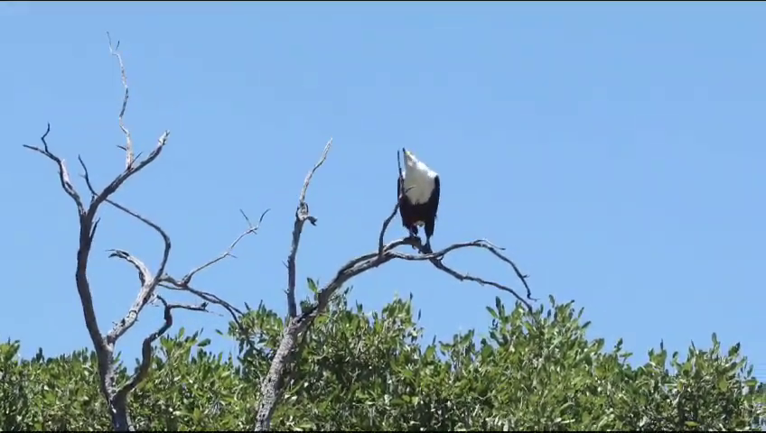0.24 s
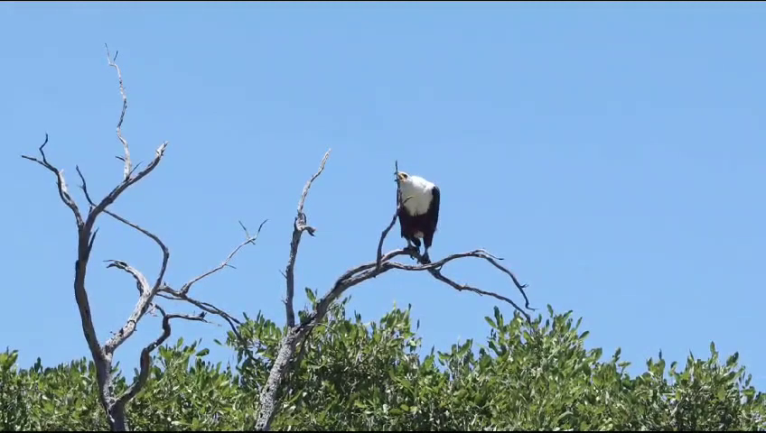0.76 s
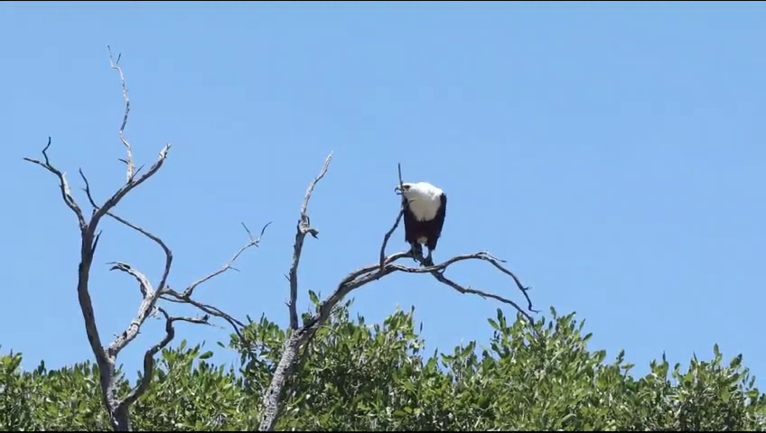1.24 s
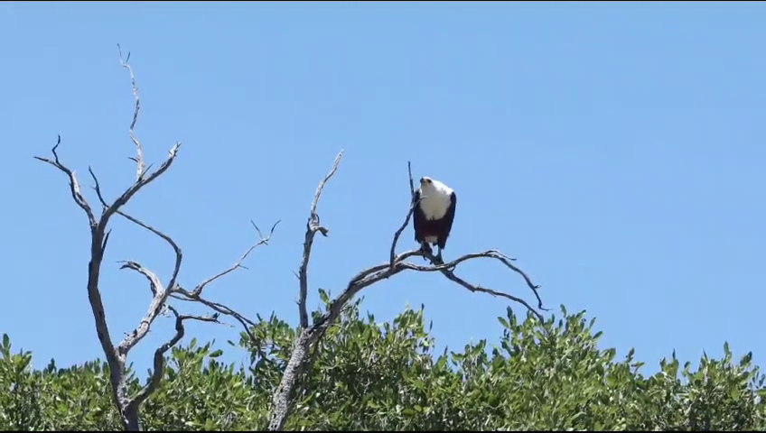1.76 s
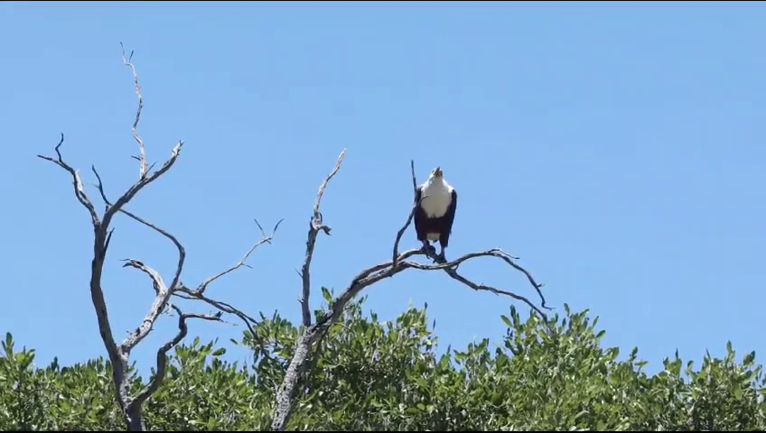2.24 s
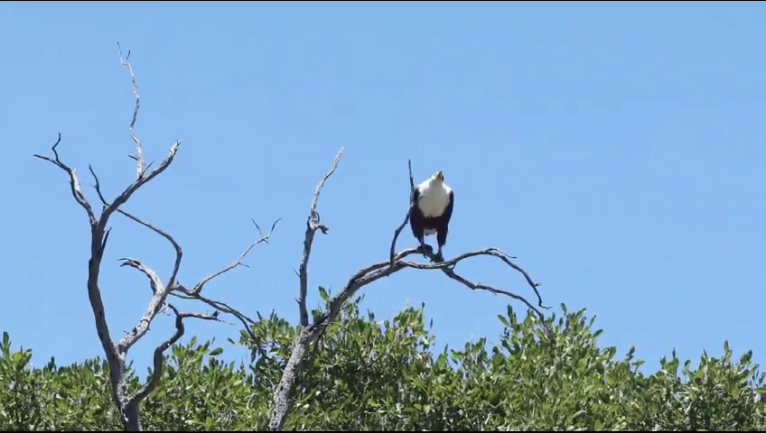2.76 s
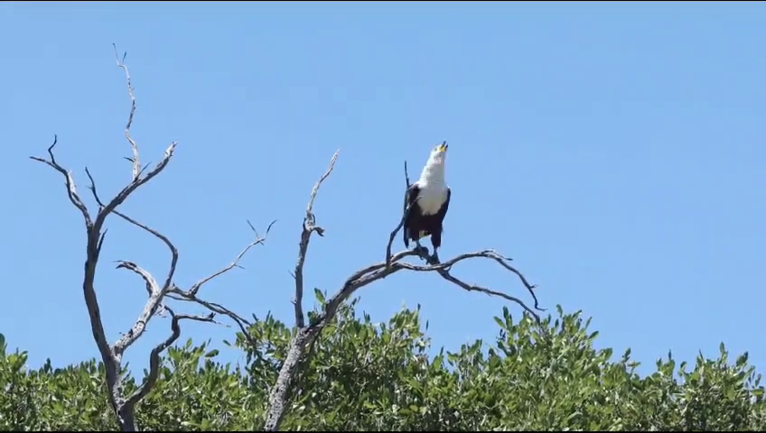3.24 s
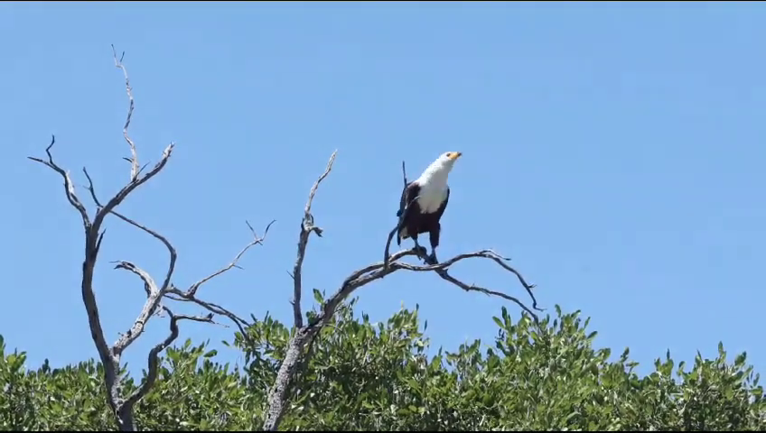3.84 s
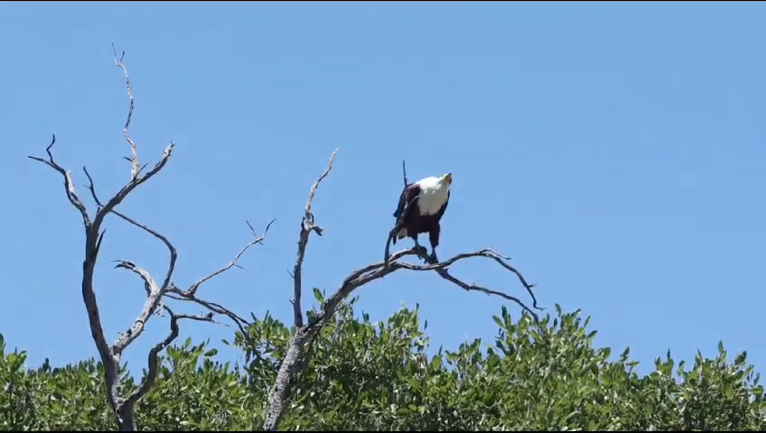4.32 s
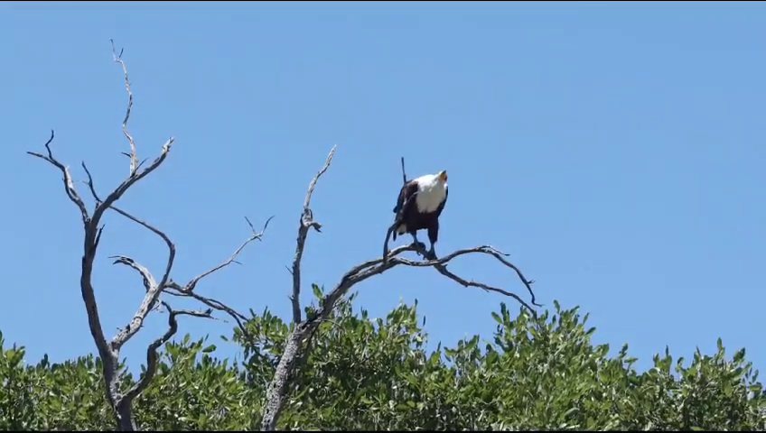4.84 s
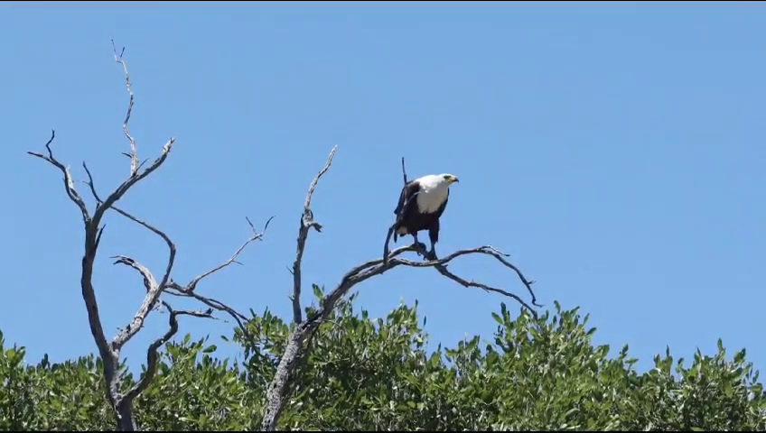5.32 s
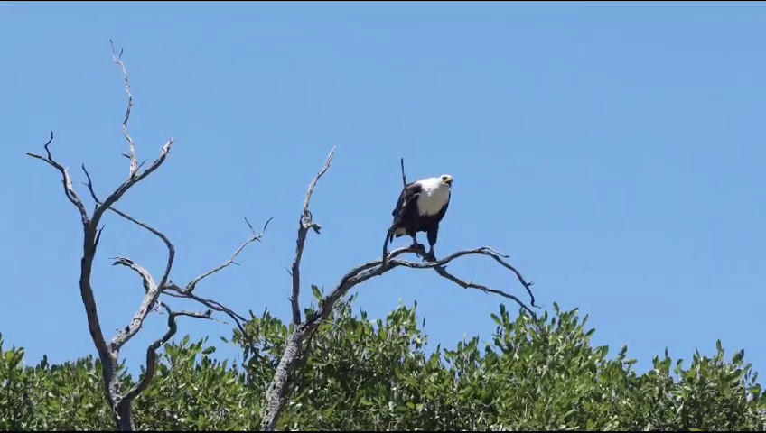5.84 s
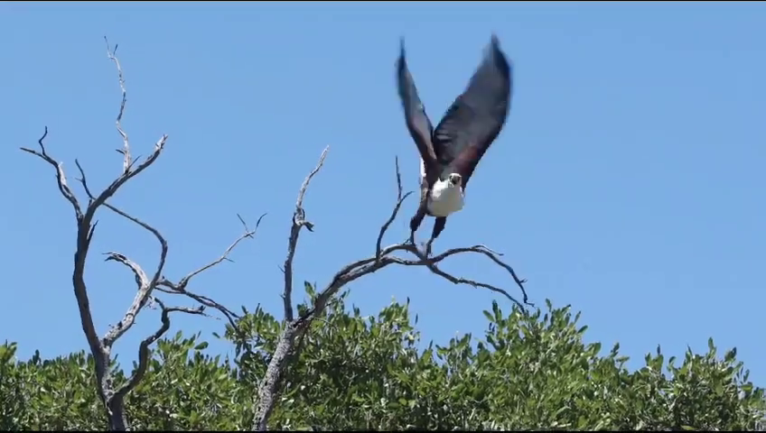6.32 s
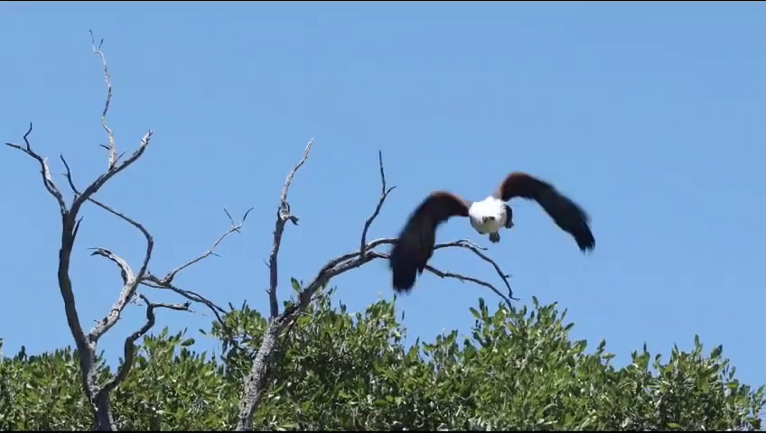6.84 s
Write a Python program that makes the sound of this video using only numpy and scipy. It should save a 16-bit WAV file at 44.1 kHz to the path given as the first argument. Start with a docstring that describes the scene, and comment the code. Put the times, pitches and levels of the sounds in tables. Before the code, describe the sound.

A small bird chirps faintly far off, then a large bird of prey starts a series of high, clear yelps outdoors. They grow louder and jump abruptly in pitch, then drop back. A soft hiss and four quick pants fill a short gap before a second, briefer bout of lower yelps. Each call leaves a light, lingering echo from the trees, and the microphone picks up almost no background noise.

```python
"""An eagle on a bare branch, with a long diffuse echo from trees and banks over near silence.
0-0.8 s: a puff of air, the echo of an earlier note dies away, a small bird chirps far off.
0.6-5 s: yelps, a near-pure syrinx tone with strong overtones that jumps between registers; slack
membranes rasp at the note edges, and the eagle coos softly while drawing air.
5.1-5.8 s: a hiss through the open beak, then four pants. 5.8-6.8 s: the last yelps."""
import sys
import numpy as np
from scipy import signal
from scipy.fft import rfft, irfft, next_fast_len
from scipy.io import wavfile
from scipy.ndimage import uniform_filter1d

SR = 44100
rng = np.random.default_rng(int(sys.argv[2]) if len(sys.argv) > 2 else 0)


def pcm_store(signal):
    """Save signal as 16-bit PCM."""
    levels = np.round(np.clip(np.atleast_2d(signal), -1, 1) * 32767)
    wavfile.write(sys.argv[1], SR, levels.astype(np.int16).T)


N = 312228
BAND_LIMIT_HZ = 15700

# Syrinx contours, one per note or register: t/s, f/Hz, fundamental/dB, 2nd harmonic/dB
YELP_CONTOURS = [
    [(.655, 964, -34.5, -26), (.675, 1039, -43, -47.5), (.7, 1078, -35.5, -48.5), (.725, 1101, -38, -44),
     (.77, 1121, -39, -44), (.88, 1119, -39.5, -45), (.96, 1140, -38, -40), (1.04, 1143, -41.5, -47.5),
     (1.1, 1164, -36, -39), (1.15, 1172, -30.5, -42.5), (1.24, 1161, -39, -39), (1.31, 1100, -40.5, -47.5),
     (1.35, 984, -41.5, -41.5)],
    [(1.555, 1063, -42, -45.5), (1.59, 1105, -41.5, -46.5), (1.64, 1135, -39.5, -40),
     (1.72, 1141, -38.5, -45), (1.81, 1100, -39.5, -41.5), (1.85, 1049, -35.5, -47.5),
     (1.875, 872, -60, -39)],
    [(2.168, 1020, -42.5, -57.5), (2.19, 1029, -30, -48.5), (2.232, 1158, -28, -44)],
    [(2.232, 1309, -24.5, -49.5), (2.27, 1359, -24.5, -44.5), (2.33, 1386, -22, -44),
     (2.41, 1402, -20, -41.5), (2.5, 1383, -23, -44), (2.527, 1377, -22.5, -47.5), (2.54, 1284, -21, -40)],
    [(2.54, 1194, -29.5, -40.5), (2.57, 1159, -32, -44), (2.6, 1113, -37, -42.5), (2.64, 999, -47.5, -56)],
    [(3.052, 1031, -47, -30), (3.067, 1241, -38, -36), (3.087, 1418, -26.5, -27.5),
     (3.125, 1440, -22.5, -28.5), (3.16, 1424, -24.5, -31), (3.19, 1342, -28.5, -34),
     (3.215, 1262, -31, -34)],
    [(3.215, 1632, -23.5, -31.5), (3.24, 1519, -27.5, -41), (3.265, 1430, -38, -53.5),
     (3.295, 1380, -29, -56)],
    [(3.295, 1352, -32, -55.5), (3.325, 1523, -33.5, -51), (3.36, 1540, -55.5, -52),
     (3.385, 1514, -33, -46), (3.4, 1386, -22.5, -52.5)],
    [(3.4, 1351, -31, -48.5), (3.415, 1204, -29, -52), (3.43, 1120, -56.5, -55.5)],
    [(3.655, 1058, -48.5, -35.5), (3.67, 1212, -36.5, -36), (3.69, 1354, -26, -28),
     (3.715, 1363, -26, -33.5), (3.74, 1323, -26.5, -31.5), (3.767, 1241, -27.5, -33)],
    [(3.767, 1553, -20.5, -36), (3.79, 1458, -25, -42.5), (3.82, 1295, -32, -52)],
    [(3.82, 1305, -26, -46), (3.85, 1422, -34, -55.5), (3.89, 1435, -35.5, -53), (3.92, 1426, -34.5, -54),
     (3.942, 1350, -30, -50.5)],
    [(3.942, 1086, -26.5, -54.5), (3.962, 1070, -40.5, -60)],
    [(4.475, 802, -56, -58), (4.492, 989.4, -44.5, -48.5), (4.515, 1110, -43, -32.5),
     (4.57, 1200, -34, -38.5), (4.64, 1143, -38.5, -35.5), (4.72, 1122, -39, -35.5),
     (4.8, 1146, -35.5, -36.5), (4.91, 1152, -40, -37), (4.94, 1048, -38, -33), (4.965, 917, -52.5, -45.5)],
    [(5.85, 898, -41.5, -60), (5.875, 1014, -46, -51), (5.905, 1088, -42, -50.5), (5.96, 1093, -46.5, -42),
     (6.03, 1117, -43, -33), (6.1, 1120, -45, -33), (6.15, 1136, -45.5, -30.5), (6.2, 1089, -43, -38),
     (6.25, 1026, -40.5, -39)],
    [(6.435, 978, -42, -38), (6.465, 1055, -43.5, -44), (6.495, 1042, -37, -37.5),
     (6.525, 1055, -33.5, -39), (6.555, 1144, -40.5, -39), (6.59, 1082, -38.5, -39),
     (6.625, 1028, -35.5, -38), (6.66, 930, -50.5, -43)],
    [(6.66, 920, -45.5, -39.5), (6.71, 995, -39.5, -46.5), (6.745, 940, -40.5, -44), (6.77, 869, -62, -51)],
]
# Hoarseness with taut membranes, per note: 0-1
YELP_HOARSENESS = [.05, .05, .1, .03, .2, .05, .55, .33, .7, .05, .6, .28, .8, .08, .05, .12, .5]
# Timbre per note: taut f/Hz, 3rd harmonic/dB, drift/dB, 4th/dB, drift/dB, brightness (5th up)/dB,
# drift/dB, throat air/dB, treble lift/(dB/octave)
YELP_TIMBRES = [(1159.4, -45.5, -2.5, -61.5, -3, -51.5, -5.5, -69.5, -2.5),
                (1154, -45.5, 0, -62, -17.5, -54, 7, -74, 4.5),
                (1130, -50, -2, -61.5, 0, -53.5, -1.5, -87, 2.5),
                (1410, -50, 11.5, -49.5, 6.5, -52, 2, -82, -0.5),
                (1140, -43.5, 6.5, -53.5, 8.5, -54.5, -2, -74.5, 6.5),
                (1425, -35.5, -8.5, -42, -10, -57, -18, -80.5, -3),
                (1600, -63, -6, -71.5, -8, -79, -2, -88, 2), (1500, -56, 6, -70.5, 3, -67, 3, -86.5, 4.5),
                (1410, -51, 4.5, -50.5, -2.5, -59, 4, -85.5, -5.5),
                (1327, -41, -22, -47, -16.5, -56.5, -5, -76.5, 4.5),
                (1480, -66, -16, -63.5, -5, -61.5, -6, -78, -4), (1425, -60.5, 2, -73, 0, -61.5, 9, -77, 9),
                (1240, -44, 0, -75, -4, -54, 4, -85, 3),
                (1145, -43.5, 0.5, -58.5, -8.5, -52, -0.5, -72, -5),
                (1137, -46, -12, -59, -9.5, -60, -6, -84, 7),
                (1130, -43, 3.5, -55.5, -5, -57, 14, -72, 4.5),
                (993, -55.5, 4, -68.5, -2, -68.5, 18, -68, 0)]
# Windpipe dip on the 4th harmonic: f/Hz, gain/dB
WINDPIPE_NOTCH = [(4200, -0.5), (4400, -6), (4600, -10.5), (4900, -13), (5300, 0.5)]
# Harmonics 5-15: f/Hz, level/dB re brightness
UPPER_SPECTRUM = [(4600, -8.5), (5600, -6.5), (6800, 1), (8000, 0.5), (9200, -13), (10500, -16),
                  (12000, -16.5), (15000, -24.5)]
# Treble air noise: f/Hz, relative density/dB
FIZZ_SPECTRUM = [(3000, -38), (6000, -5.5), (9000, 8.5), (15500, 6.5)]
FIZZ_DB, FIZZ_HOARSE_DB, LIFT_FROM_HZ = -18, 6, 6970
# Change per unit of slack:
SLACK_3RD_DB, SLACK_4TH_DB, SLACK_BRIGHT_DB = -67, -60.5, -110
SLACK_AIR_DB, SLACK_LIFT_DB_OCT = 97, -100
BREAKING_SLACK = .155


def yelp(contour, taut_hoarse, taut_hz, third_db, third_drift_db, fourth_db, fourth_drift_db,
         bright_db, bright_drift_db, air_db, lift_db_oct):
    """Syrinx tone plus air noise; slack membranes sound dull and hoarse and leak more air."""
    t, hz, first_db, second_db = per_sample(contour)
    count = len(t)
    hz = uniform_filter1d(hz, round(0.02 * SR), mode="nearest")  # muscles round off pitch turns
    slack = abs(1 - hz / taut_hz)
    hoarse = np.minimum(taut_hoarse + (slack / BREAKING_SLACK) ** 2, .9)
    wobble = .0005 * wander(count, .005) + .0015 * wander(count, .015)
    phase = 2 * np.pi * np.cumsum(hz * (1 + wobble)) / SR

    along = np.linspace(-.5, .5, count)
    third_db = third_db + third_drift_db * along + SLACK_3RD_DB * slack
    fourth_db = fourth_db + fourth_drift_db * along + SLACK_4TH_DB * slack
    bright_db = bright_db + bright_drift_db * along + SLACK_BRIGHT_DB * slack
    lift_db_oct = lift_db_oct + SLACK_LIFT_DB_OCT * slack
    levels_db = [first_db, second_db, third_db, fourth_db + lookup(WINDPIPE_NOTCH, 4 * hz)]
    for k in range(5, 16):
        octaves = np.log2(np.maximum(k * hz / LIFT_FROM_HZ, 1))
        levels_db.append(bright_db + lookup(UPPER_SPECTRUM, k * hz) + lift_db_oct * octaves)

    tone = harmonics(hz, phase, levels_db, hoarse) + gain(first_db) * half_harmonics(t, hz, phase)
    fizz_db = bright_db + FIZZ_DB + FIZZ_HOARSE_DB * hoarse
    fizz = gain(fizz_db) * coloured(rng.standard_normal(count), FIZZ_SPECTRUM)
    air = growl(count, air_db + SLACK_AIR_DB * slack)
    to_edge_s = np.minimum(t - t[0], t[-1] - t)
    fade = np.sin(np.pi / 2 * np.minimum(1, to_edge_s / 0.0037)) ** 2
    return t[0], fade * (np.sqrt(2) * tone + fizz + air)


def harmonics(hz, phase, levels_db, hoarse):
    """Syrinx harmonics, each flickering on its own; higher ones break up first and smear wider."""
    count = len(hz)
    tone = 0
    for k, db in enumerate(levels_db, 1):
        noisy = np.clip(hoarse ** 2 * k / 3 + .05 * max(k - 8, 0), 0, 1)
        grain_s = .008 / max(k, 2)
        pure = np.sin(k * phase)
        blur = wander(count, grain_s) * pure + wander(count, grain_s) * np.cos(k * phase)
        partial = np.sqrt(1 - noisy ** 2) * pure + noisy * blur / np.sqrt(2)
        flicker_db = np.interp(k, [1, 2, 7, 9], [.8, 2, 2, 4.5]) * wander(count, .014)
        swell_db = 2.5 * wander(count, .04) * (k > 3)
        tone += gain(db + flicker_db + swell_db) * partial * (k * hz < BAND_LIMIT_HZ)
    return tone


# Spells of pulse alternation: start t/s, deepest t/s, end t/s, depth/dB
ALTERNATIONS = [(4.732, 4.897, 4.96, -3), (6.633, 6.672, 6.8, 2.5)]
# Half harmonics at 0 dB depth: f/Hz, level/dB re fundamental
HALF_SPECTRUM = [(500, -6), (570, -49), (1300, 1), (1450, 3), (1750, 7.5), (2900, -17), (4000, -27.5),
                 (8000, -40.5)]


def half_harmonics(t, hz, phase, ends_db=-41):
    """Strong and weak pulses alternate, putting lines halfway between the harmonics."""
    depth = sum(gain(db + np.interp(t, times_s, [ends_db, 0, ends_db], -200, -200))
                for *times_s, db in ALTERNATIONS)
    return depth * sum(gain(lookup(HALF_SPECTRUM, k * hz)) * np.sin(k * phase)
                       for k in np.arange(8) + .5)


def growl(count, db):
    """Leaking air rings the throat between the first two harmonics."""
    air = resonate_twice(rng.standard_normal(count), hz=1720, width_hz=240)
    return gain(db + 1.5 * wander(count, .04)) * unit_rms(air)


# Pulses at note edges: t/s, length/s, first rate/Hz, last rate/Hz, level/dB, roughness, chest gain/dB
RASP_BURSTS = [(0.635, 0.038, 398.4, 467, -46.5, 0.7, 0.5), (1.331, 0.052, 424, 388, -54, 0.48, -2),
               (1.525, 0.048, 323.1, 503.5, -38.5, 0.69, -3), (1.863, 0.036, 468, 401, -50.5, 0.75, -12),
               (2.144, 0.041, 346, 515, -39.5, 0.51, 1.5), (3.039, 0.023, 395.4, 506, -42.5, 0.61, -4),
               (3.393, 0.061, 550, 462, -56, 0.84, -24), (3.639, 0.028, 408.7, 460, -44.5, 1.04, -7),
               (3.939, 0.029, 569, 457, -55, 0.73, -21), (4.457, 0.03, 386.4, 436, -47, 0.7, 2.5),
               (4.944, 0.04, 445, 405, -57, 1.1, -30), (5.834, 0.036, 409, 502, -49.5, 0.1, 4.5),
               (6.24, 0.045, 469, 405, -42, 0.3, -2.5), (6.411, 0.049, 425, 498, -41, 0.61, -2),
               (6.746, 0.018, 458, 378, -49, 0.32, 1.5)]


def rasp(start_s, length_s, first_hz, last_hz, db, rough, chest_db):
    """Slack membranes slap unevenly, with a puff of noise on each slap."""
    count = round(length_s * SR)
    rate_hz = np.linspace(first_hz, last_hz, count) * (1 + 0.084 * rough * wander(count, .002))
    cycles = np.cumsum(rate_hz) / SR
    slaps = sum(np.cos(2 * np.pi * k * cycles) for k in range(1, 24))
    puffs = (0.1 + np.exp(-(cycles % 1) / 0.057)) * rng.standard_normal(count)
    drive = (1 - rough) * unit_rms(slaps) + rough * unit_rms(puffs)
    return start_s, gain(db) * throat(drive, chest_db) * np.hanning(count)


# Windpipe and beak resonances: f/Hz, width per pass/Hz, gain/dB
THROAT_MODES = [(963, 325, 2), (1483, 454, 10.5), (3360, 230, -14), (6200, 2100, -27.5)]
CHEST_HZ, CHEST_WIDTH_HZ = 457, 260


def throat(drive, chest_db):
    """Chest, windpipe and beak resonances, each applied twice for deep valleys."""
    modes = [(CHEST_HZ, CHEST_WIDTH_HZ, chest_db)] + THROAT_MODES
    return unit_rms(sum((-1) ** k * gain(db) * resonate_twice(drive, hz, width_hz)
                        for k, (hz, width_hz, db) in enumerate(modes)))


# Opening puff, long hiss, four pants: t/s, rise/s, hold/s, level/dB
HISS_BURSTS = [(.004, 0.039, .002, -59), (5.118, 0.1, 0.16, -53.5), (5.449, 0.015, .008, -56.5),
               (5.543, 0.016, 0.009, -58.5), (5.627, 0.017, 0.014, -58), (5.716, 0.018, 0.013, -58.5)]
# Open beak: f/Hz, relative density/dB
HISS_SPECTRUM = [(410, -79), (700, -31), (968, -16.5), (1150, -16), (1390, -29.5), (1670, -8), (2000, -23),
                 (2310, -21), (2460, -20), (2800, -1.5), (3250, 2.5), (3650, -3.5), (4000, -14),
                 (4700, -8.5), (5150, -10.5), (5640, -26.5), (6850, -16), (7900, -20), (9110, -29.5),
                 (15500, -31.5)]
HISS_RISE_DB, HISS_FALL_DB_PER_S, HISS_FALL_S = 27, 516, 0.066


def hiss(start_s, rise_s, hold_s, db):
    """Air forced through the open beak, fluttering: rise, hold, release."""
    t = times(rise_s + hold_s + HISS_FALL_S)
    attack_db = -HISS_RISE_DB * np.maximum(1 - t / rise_s, 0) ** 2
    release_db = -HISS_FALL_DB_PER_S * np.maximum(t - rise_s - hold_s, 0)
    air = coloured(rng.standard_normal(len(t)), HISS_SPECTRUM)
    flutter_db = 0.7 * wander(len(t), .003)
    envelope = gain(db + attack_db + release_db + flutter_db) * signal.windows.tukey(len(t), .1)
    return start_s, envelope * air


# Breaths at breaks and after notes: t/s, length/s, beak level/dB, throat level/dB, end swell/dB
BREATHS = [(1.335, 0.17, -57.5, -58.5, 11.5), (1.858, 0.25, -66.5, -61, 16), (2.626, 0.71, -59, -77.5, 21),
           (3.2, 0.09, -55, -78.5, 8), (3.288, 0.13, -69.5, -71.5, 9), (3.39, 0.21, -57.5, -49.5, 4),
           (3.763, 0.075, -57, -73, 5), (3.849, 0.12, -59, -67, 10), (3.921, 0.17, -67, -54.5, -4),
           (4.94, 0.21, -52.5, -69.5, -5), (6.237, 0.16, -73, -59, 17), (6.643, 0.083, -66, -63, 6),
           (6.73, .035, -58, -59, 6), (6.765, 0.077, -88, -75, -5)]
# Half-shut beak: f/Hz, relative density/dB
BEAK_SPECTRUM = [(2500, -36), (4000, 7), (6500, -2.5), (9000, 4.5), (15500, 0)]
BEAK_TRIM_DB, BEAK_DROP_DB, BEAK_DROP_S, THROAT_FALL_DB_PER_S = -2.5, 30, 0.033, 40.5


def breath(start_s, length_s, beak_db, throat_db, swell_db):
    """Air drawn through half-shut beak and throat: the beak hiss drops fast, the throat slowly."""
    t = times(length_s)
    swell_db = swell_db * np.exp((t - length_s) / 0.011)
    beak_db = beak_db - BEAK_DROP_DB * (1 - np.exp(-t / BEAK_DROP_S)) + swell_db
    throat_db = throat_db - THROAT_FALL_DB_PER_S * t + .4 * swell_db
    beak_air = gain(beak_db + BEAK_TRIM_DB) * coloured(rng.standard_normal(len(t)), BEAK_SPECTRUM)
    throat_air = gain(throat_db) * throat(rng.standard_normal(len(t)), chest_db=-12)
    flutter = gain(1.5 * wander(len(t), 0.0065))
    return start_s, flutter * (beak_air + throat_air) * signal.windows.tukey(len(t), .15)


# Tones while drawing air: t/s, length/s, first f/Hz, middle f/Hz, last f/Hz, level/dB, drift/dB
COO_TONES = [(1.395, .13, 500, 642, 585, -66, 0), (1.925, .21, 660, 780, 620, -66, 0),
             (1.92, .21, 453, 550, 480, -70, -2), (3.45, .17, 485, 468, 448, -66, -16),
             (3.97, .11, 452, 425, 390, -68, 4)]


def coo(start_s, length_s, first_hz, middle_hz, last_hz, db, drift_db, ends_db=-18.5):
    """A soft wavering tone that glides through three pitches as its level arches."""
    count = round(length_s * SR)
    along = np.linspace(-1, 1, count)
    hz = middle_hz + (np.where(along < 0, first_hz, last_hz) - middle_hz) * along ** 2
    tone = np.sin(2 * np.pi * np.cumsum(hz + 14 * wander(count, .004)) / SR)
    level_db = db + drift_db * along / 2 + ends_db * along ** 4 + 3.5 * wander(count, 0.023)
    return start_s, np.sqrt(2) * gain(level_db) * tone * signal.windows.tukey(count, .2)


# Small bird: t/s, length/s, first f/Hz, middle f/Hz, last f/Hz, level/dB, drift/dB
FAR_CHIRPS = [(.095, 0.031, 2810, 2830, 2830, -75.5, -3), (0.175, 0.027, 2720, 2840, 2880, -74.5, 6),
              (0.243, 0.031, 2730, 2820, 2790, -71.5, -8), (0.327, 0.03, 2900, 2700, 2705, -69.5, -4)]


def chirp(*row):
    """A small bird far off: a brief high tone, shaped like a coo."""
    return coo(*row)


# Near reflections: delay/s, left gain, right gain
REFLECTIONS = [(.004, 0.014, 0.0008), (.009, -0.08, 0.019), (0.016, 0.017, -0.096), (.026, .1, .15),
               (.034, -0.077, 0.063)]
# Diffuse echo: f/Hz, early T60/s, relative level/dB
ECHO_BANDS = [(400, 0.29, -16.5), (1160, 0.78, 3.5), (1780, 0.23, 12.5), (2520, 0.41, 10), (3980, 0.42, 2),
              (8050, 0.44, -3), (15360, 0.69, 8.5)]
ECHO_DB, FAR_BANKS_DB, FAR_BANKS_STRETCH = -12, -18.5, 4.18


def echo(dry):
    """Trees and banks: near reflections, then a diffuse tail, each band dying at its own rate."""
    size = 2 * SR
    taps = np.zeros((3, size))  # shared, left, right
    slots = np.arange(800, size - 20, 20)
    arrivals = slots + rng.integers(0, 20, (3, len(slots)))
    np.put_along_axis(taps, arrivals, rng.choice([-1., 1.], arrivals.shape), 1)
    hz, t, bands = signal.stft(taps[0] + .5 * taps[1:], SR, nperseg=256)
    fall_db = 60 * t / lookup(ECHO_BANDS, hz)[:, None]
    decay = gain(-fall_db) + gain(FAR_BANKS_DB - fall_db / FAR_BANKS_STRETCH)
    colour = gain(lookup(ECHO_BANDS, hz, column=2))[:, None]
    tail = signal.istft(bands * decay * colour, SR, nperseg=256)[1]
    response = tail * gain(ECHO_DB) / np.linalg.norm(tail[0])
    for delay_s, *gains in REFLECTIONS:
        response[:, round(delay_s * SR)] += gains
    return signal.fftconvolve(dry[None], response, axes=1)[:, :N]


def dying_echo(length_s=0.77, db=-60.5):
    """The echo of an earlier note: narrow stereo noise, fading ever faster."""
    t = times(length_s)
    noise = rng.standard_normal(len(t)) + 1.54 * rng.standard_normal((2, len(t)))
    ring = unit_rms(resonate_twice(noise, hz=1283, width_hz=101))
    fall_db = 14.5 * t + 56 * t ** 3
    fade = np.minimum((length_s - t) / 0.024, 1)
    return gain(db - fall_db) * ring * fade


# Electronic noise floor: f/Hz, relative density/dB
CIRCUIT_SPECTRUM = [(100, 3), (3000, 0.5), (9000, 1.5), (15500, -3.5)]


def circuit_hiss(db=-100):
    """Steady circuit noise, independent per channel."""
    return gain(db) * np.array([coloured(side, CIRCUIT_SPECTRUM) for side in rng.standard_normal((2, N))])


# Suppressor threshold tilt: f/Hz, offset/dB
THRESHOLD_TILT = [(4000, 10), (9000, -6.5)]


def suppress(x, threshold_db=-100, cut_db_per_db=0.93):
    """A noise suppressor turns down bins under its threshold, so faint tails thin out."""
    hz, _, bins = signal.stft(x, SR, nperseg=1024, noverlap=768)
    power = (abs(bins) ** 2).mean(0)
    power = uniform_filter1d(uniform_filter1d(power, size=3, axis=0), size=3, axis=1)
    level_db = 10 * np.log10(abs(power) + 1e-20)
    under_db = np.clip(threshold_db + lookup(THRESHOLD_TILT, hz)[:, None] - level_db, 0, 40)
    return signal.istft(bins * gain(-cut_db_per_db * under_db), nperseg=1024, noverlap=768)[1][:, :N]


# Microphone ports: f/Hz, left minus right level/dB, left phase lead/rad
PORT_BALANCE = [(500, 0, 0.22), (1120, -1.5, 0.4), (1441, -1.5, -0.5), (2280, -1.7, -0.29), (2630, -6, 1),
                (3230, -4, 0.52), (3900, -1, 1), (4840, 4.5, 1), (5600, -1.5, 1), (7650, -1.5, 0.47),
                (8600, -9, 0.22), (10300, -2.5, 0)]


def microphone_ports(dry):
    """Two close ports hear each band at their own level and phase."""
    size = next_fast_len(N + 4096)
    hz = np.fft.rfftfreq(size, 1 / SR)
    left = gain(lookup(PORT_BALANCE, hz) / 2) * np.exp(.5j * lookup(PORT_BALANCE, hz, column=2))
    return irfft(rfft(dry, size) * np.array([left, 1 / left]), size)[:, :N]


def gain(db):
    return 10 ** (np.asarray(db) / 20)


def unit_rms(x):
    return x / np.sqrt(np.mean(x ** 2) + 1e-20)


def times(length_s):
    return np.arange(round(length_s * SR)) / SR


def lookup(table, hz, column=1):
    """Interpolates a column over log frequency."""
    columns = np.transpose(table)
    return np.interp(np.log(hz + 1), np.log(columns[0] + 1), columns[column])


def per_sample(contour):
    """Interpolates timed rows to one value a sample."""
    knots_s, *columns = np.transpose(contour)
    t = np.arange(knots_s[0], knots_s[-1], 1 / SR)
    return t, *(np.interp(t, knots_s, column) for column in columns)


def wander(count, smooth_s):
    """Smooth random drift, rms 1."""
    size = max(round(smooth_s * SR), 1)
    return unit_rms(uniform_filter1d(uniform_filter1d(rng.standard_normal(count), size), size))


def coloured(x, spectrum):
    """Imposes a spectral shape, rms 1."""
    hz = np.fft.rfftfreq(len(x), 1 / SR)
    return unit_rms(irfft(rfft(x) * gain(lookup(spectrum, hz)), len(x)))


def resonate_twice(x, hz, width_hz):
    """Two passes of a unity-gain resonance: shift to 0 Hz, smooth, shift back."""
    carrier = np.exp(2j * np.pi * hz * np.arange(x.shape[-1]) / SR)
    pole = np.exp(-np.pi * width_hz / SR)
    for _ in range(2):
        x = 2 * (carrier * signal.lfilter([1 - pole], [1, -pole], x / carrier)).real
    return x


def add(mix, start_s, sound):
    part = mix[..., round(start_s * SR):][..., :sound.shape[-1]]
    part += sound[..., :part.shape[-1]]


def scene():
    """Both birds in mono, their echoes in stereo."""
    birds = np.zeros(N)
    for contour, hoarse, timbre in zip(YELP_CONTOURS, YELP_HOARSENESS, YELP_TIMBRES):
        add(birds, *yelp(contour, hoarse, *timbre))
    for source, table in [(rasp, RASP_BURSTS), (coo, COO_TONES), (chirp, FAR_CHIRPS),
                          (hiss, HISS_BURSTS), (breath, BREATHS)]:
        for row in table:
            add(birds, *source(*row))
    background = np.zeros((2, N))
    add(background, 0, dying_echo())
    return birds + echo(birds) + background


def record(dry):
    """Ports, bass cut, suppressor, circuit hiss, band limit."""
    bass_cut = signal.butter(2, 300, "high", fs=SR, output="sos")
    thin = signal.sosfilt(bass_cut, microphone_ports(dry))
    band_limit = signal.firwin(511, BAND_LIMIT_HZ, window=("kaiser", 9), fs=SR)
    return signal.oaconvolve(suppress(thin) + circuit_hiss(), band_limit[None], "same")


dry = scene()
out = record(dry)
pcm_store(out)
```